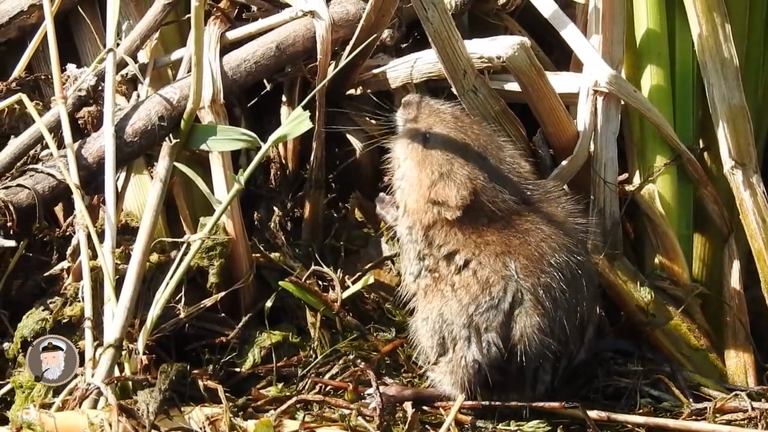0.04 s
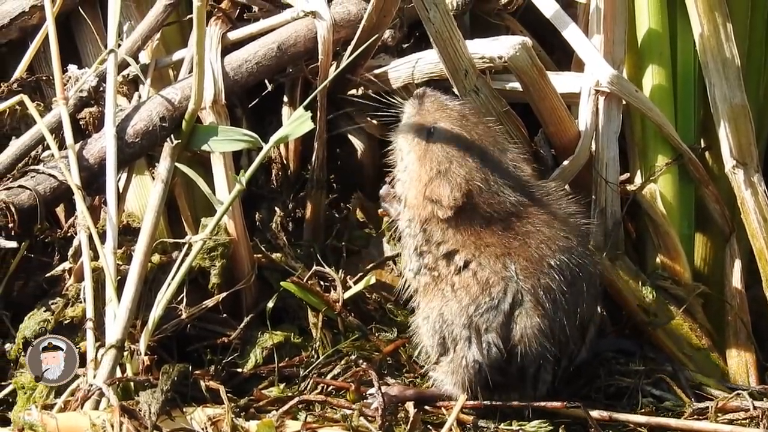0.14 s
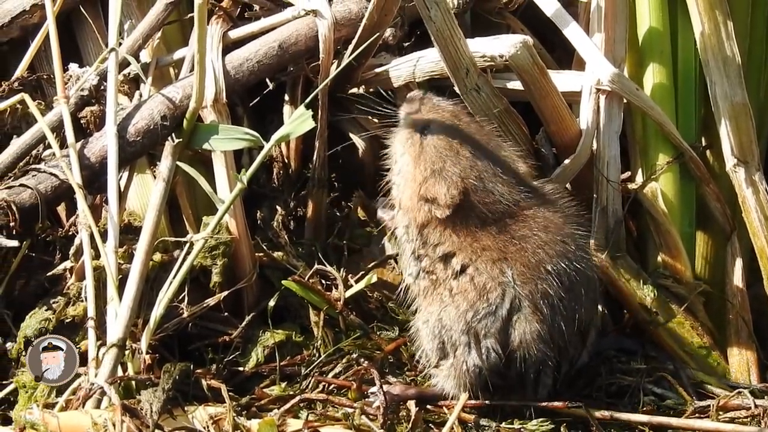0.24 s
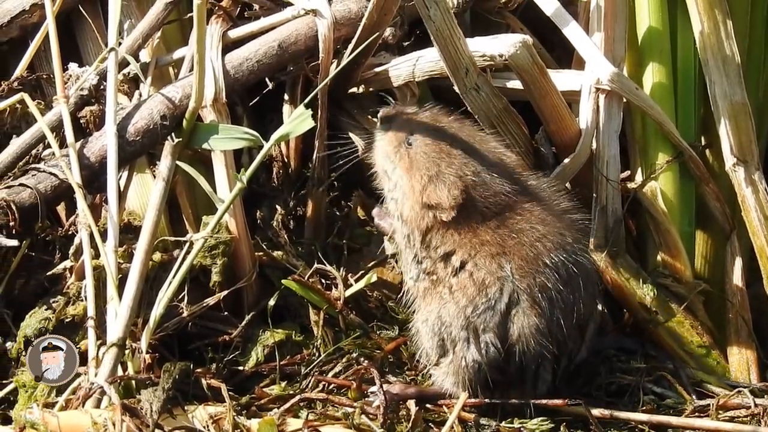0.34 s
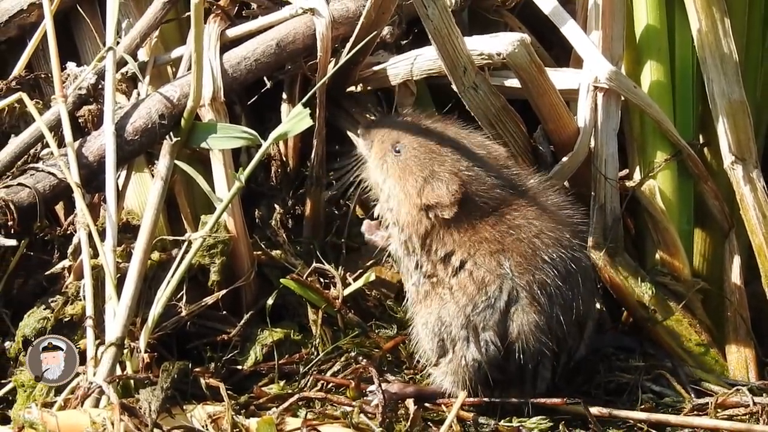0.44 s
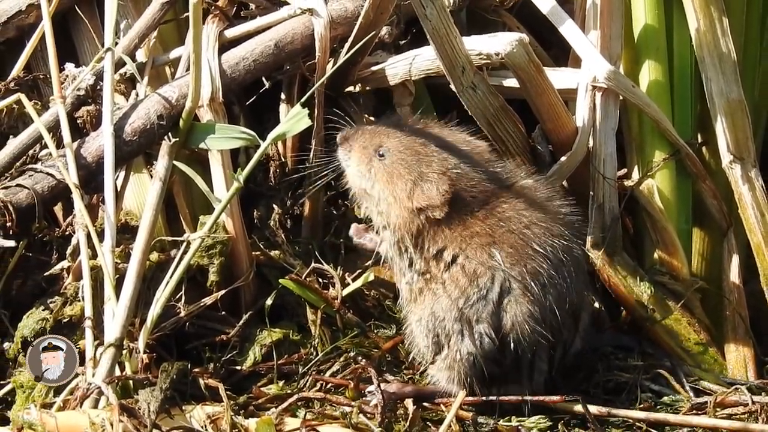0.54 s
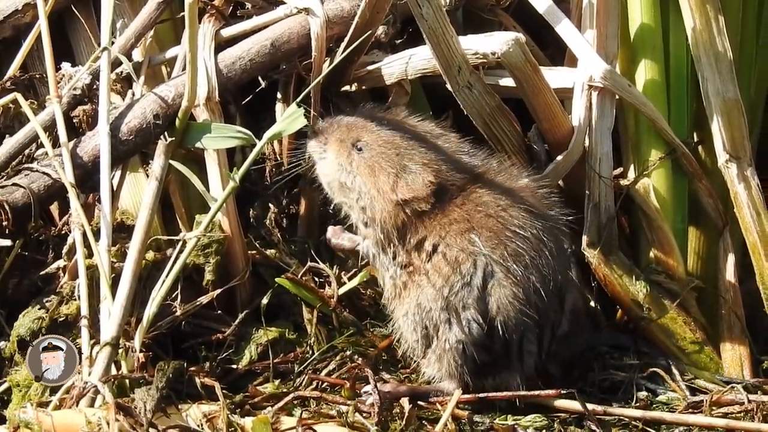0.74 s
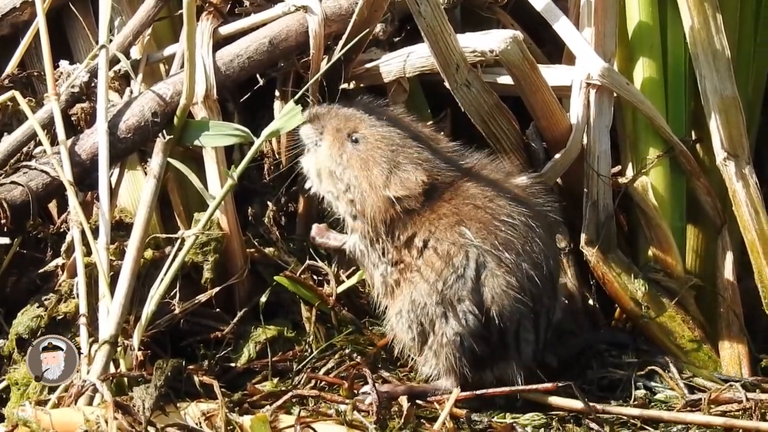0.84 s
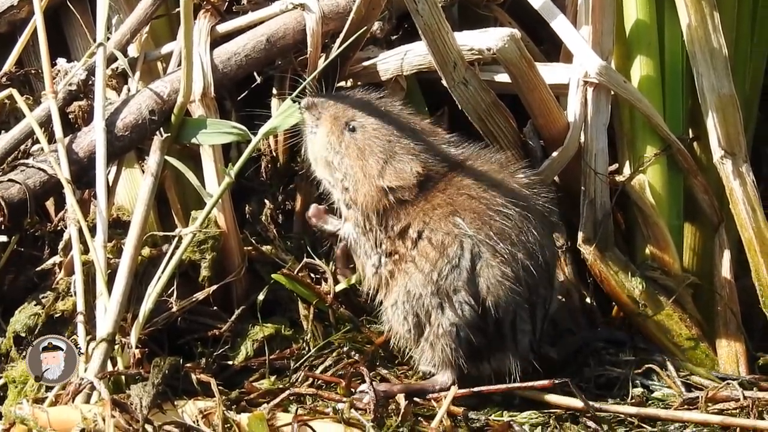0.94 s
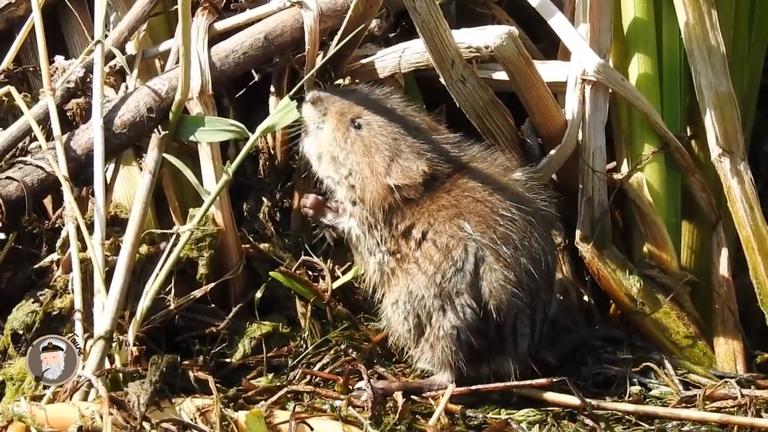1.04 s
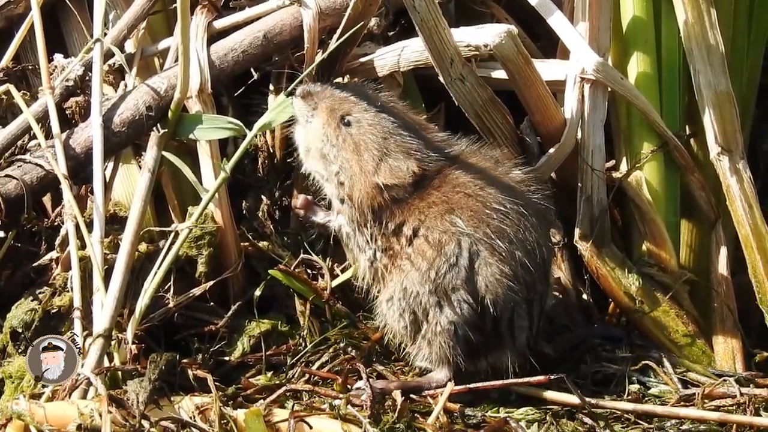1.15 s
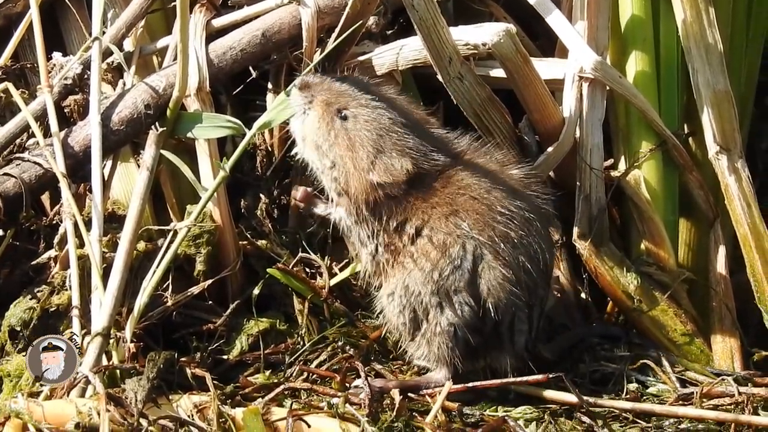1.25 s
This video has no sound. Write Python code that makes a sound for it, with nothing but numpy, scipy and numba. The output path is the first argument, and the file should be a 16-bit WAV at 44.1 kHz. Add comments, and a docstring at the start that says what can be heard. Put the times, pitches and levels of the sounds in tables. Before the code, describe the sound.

Wind blows through a reed bed, dry leaves hissing steadily. Early on, a gust rumbles and knocks on the microphone, mostly on the left, then eases as a distant bird gives two faint, raspy chirps.

```python
"""Dry reed leaves hiss and tick over the low rush of open air as wind blows through a reed bed.
Soon swirls of wind (eddies) rumble and knock on the two microphone openings, mostly the left one.
The strongest push the recorder into its limiter, which briefly turns the sound down.
Later a far bird gives two short, raspy calls."""
import sys
import numpy as np
from scipy import signal
from scipy.fft import rfft, irfft
from scipy.io import wavfile
from scipy.ndimage import uniform_filter1d
from numba import njit

SR = 44100
rng = np.random.default_rng(int(sys.argv[2]) if len(sys.argv) > 2 else 0)


def log_audio(samples):
    """Write samples as a 16-bit WAV file to the path given in sys.argv[1]."""
    # one column per channel
    frames = np.atleast_2d(samples).T
    # limit to full scale, then quantise
    limited = np.clip(frames, -1, 1)
    pcm = np.round(limited * 32767).astype(np.int16)
    wavfile.write(sys.argv[1], SR, pcm)


N = 57330  # 1.3 s


def undb(db):
    """Turn decibels into a number to multiply by."""
    return 10 ** (np.asarray(db) / 20)


def unit(x):
    """Scale a signal to an average strength (rms) of 1."""
    return x / np.sqrt(np.mean(x ** 2))


def noise(channels=2):
    """Plain white noise, different in each channel."""
    return rng.standard_normal((channels, N))


def shape(x, points):
    """Turn frequencies up or down along a curve of (f/Hz, gain/dB) points."""
    hz, db = np.array(points).T
    f = np.maximum(np.linspace(0, SR / 2, N + 1), 1)
    gain = undb(np.interp(np.log(f), np.log(hz), db))
    return irfft(rfft(x, 2 * N) * gain)[..., :N]


def colour(x, points):
    """Give a noise the tone of such a curve, at strength 1."""
    return unit(shape(x, points))


def band(x, hz, width_hz):
    """Keep the sound near one pitch, as a resonance does, at strength 1."""
    f = np.arange(N // 2 + 1) * SR / N
    return unit(irfft(rfft(x) / (1 + (2 * (f - hz) / width_hz) ** 2), N))


def smooth(x, width):
    """Round off quick changes by averaging twice over `width` samples."""
    return uniform_filter1d(uniform_filter1d(x, width), width)


def wander(rate_hz):
    """A curve that drifts between random values, rate_hz of them a second."""
    hold = int(SR / rate_hz)
    steps = np.repeat(rng.standard_normal(200), hold)[:N]
    return unit(smooth(steps, hold))


def flicker(x, depth_db, rate_hz):
    """Let each of ten octaves waver in level, partly together with the others."""
    f = np.arange(N // 2 + 1) * SR / N
    octave = np.log2(np.clip(f / 30, 1, 2 ** 9))
    spectrum, shared = rfft(x), wander(rate_hz / 2)
    out = 0
    for k in range(10):
        part = irfft(spectrum * np.maximum(1 - abs(octave - k), 0), N)
        out += part * undb(depth_db * (wander(rate_hz) + shared / 2))
    return out


def swell(t, at, length):
    """A smooth rise and fall around `at`, with half the power at the ends of its length."""
    return 2 ** (-2 * ((t - at) / length) ** 2)


# Tone of the open air: f/Hz, relative level/dB
AIR_TONE = [(25, -3), (60, 4), (120, 5.5), (200, 3), (300, -4), (420, -4.5), (560, -2), (750, -8.5),
            (1100, -9), (1700, -14.5), (3000, -15.5), (5000, -18), (8000, -28), (15000, -76)]
# How loud the air is: t/s, low part level/dB, high part level/dB
AIR_LEVELS = [(0, -44, -47.5), (.25, -47.5, -50), (.5, -44.5, -49.5), (.73, -44.5, -49), (.9, -44, -50.5),
              (1.05, -44.5, -51), (1.18, -41.5, -51), (1.3, -43, -50)]

def open_air(t, split_hz=663):
    """Distant wind rushes, nearly the same left and right; its low and high parts swell separately."""
    rush = colour(noise(channels=1) + 0.24 * noise(), AIR_TONE)
    rush = flicker(rush, depth_db=2, rate_hz=22.23)
    low = signal.sosfiltfilt(signal.butter(2, split_hz, fs=SR, output="sos"), rush)
    times, low_db, high_db = np.array(AIR_LEVELS).T
    low_gain, high_gain = undb(np.interp(t, times, low_db)), undb(np.interp(t, times, high_db))
    return unit(low) * low_gain + unit(rush - low) * high_gain


# The bird's calls: t/s, length/s, pitch/Hz, level/dB of the lower resonance
BIRD_CALLS = [(0.778, 0.019, 4550, -45.5), (1.02, 0.012, 4900, -45.5)]

def far_bird(t, echo_db=-14, echo_fade_s=0.043):
    """Short raspy chirps ring at two pitches; the reeds scatter them into a faint echo."""
    out = 0
    for at, length, hz, db in BIRD_CALLS:
        lower = band(noise(channels=1) + 0.5 * noise(), hz, width_hz=870)
        upper = undb(-1.5) * band(noise(), hz=6440, width_hz=1500)
        echo = undb(echo_db) * (t > at) * np.exp(-abs(t - at) / echo_fade_s)
        out += undb(db) * (lower + upper) * np.maximum(swell(t, at, length), echo)
    return out


# Tone of the dry leaves: f/Hz, relative level/dB
LEAF_TONE = [(500, -16.5), (1500, -13), (2600, -14), (3700, -10.5), (4600, -4), (5600, -1.5), (6600, 2),
             (7300, -3), (8300, -10.5), (10000, -18.5), (12500, -26.5), (15500, -32)]
# How loud the leaves rustle: t/s, level/dB
RUSTLE_LEVELS = [(0, -43), (.15, -45.5), (.35, -45.5), (.55, -46.5), (.68, -45), (.79, -44), (.95, -46),
                 (1.15, -45), (1.3, -48)]

def reeds(t, ticks_per_s=2300, tick_spread_db=1.5, tick_share=0.32):
    """Countless leaves rub together: far ones blur into a hiss, near ones tick."""
    ticks = (rng.random((2, N)) < ticks_per_s / SR) * rng.choice([-1, 1], (2, N))
    tick_db = tick_spread_db * np.minimum(rng.exponential(size=(2, N)), 5)
    ticks = unit(ticks * undb(tick_db))
    leaves = colour(np.sqrt(tick_share) * ticks + np.sqrt(1 - tick_share) * noise(), LEAF_TONE)
    times, db = np.array(RUSTLE_LEVELS).T
    level_db = np.interp(t, times, db) + np.array([[0.8], [-0.8]])  # a little louder on the left
    return flicker(leaves, depth_db=1.5, rate_hz=24.32) * undb(level_db)


# Tone of an eddy: multiple of its centre frequency, relative level/dB
EDDY_TONE = [(.22, -40), (.4, -13.5), (.65, -2.5), (1, 2), (1.45, -6), (2.1, -17.5), (3, -26), (5.5, -38.5),
             (13, -51.5), (44, -66)]

def eddy(hz, even_out_s=0.0097):
    """Swirling air makes the pressure rumble around one frequency, evened out to a steady strength."""
    churn = colour(noise(channels=1)[0], [(hz * ratio, db) for ratio, db in EDDY_TONE])
    return churn / np.sqrt(smooth(churn ** 2, int(even_out_s * SR)))


# Passing eddies: t/s, length/s, relative level/dB, centre f/Hz, side (0 left, 1 right)
PASSING_EDDIES = [(0.212, 0.012, -21, 86, 0), (0.245, 0.027, -8, 103.3, 0), (0.28, 0.032, -25.5, 106, 0),
                  (0.311, 0.026, -5, 77.7, 0), (0.35, .045, -15, 103, 0), (0.441, 0.023, -28.5, 103, 0),
                  (.506, 0.025, -16.5, 75, 0), (0.534, 0.081, -32.5, 108, 0), (0.598, 0.015, -23.5, 62, 0),
                  (0.641, 0.024, -35.5, 92, 0), (0.77, 0.094, -39.5, 85, 0), (1.031, .03, -35.5, 100, 0),
                  (1.124, 0.025, -29, 99, 0), (1.187, 0.013, -22.5, 117, 0), (1.256, 0.049, -29, 91, 0),
                  (0.277, .05, -28.5, 92, 1), (0.36, 0.028, -12, 116, 1), (0.58, 0.051, -31.5, 77, 1),
                  (0.777, 0.021, -25, 81.5, 1), (1.273, .04, -28, 99, 1)]
# How a microphone opening responds to wind, with the deepest bass cut: f/Hz, gain/dB
MIC_RESPONSE = [(20, -39), (32, -10.5), (46, 0.5), (70, -0.5), (185, 0.5), (255, -5), (400, -8.5),
                (2000, -12.5)]

def wind_on_microphone(t, draught_db=-54.5, eddy_trim_db=-0.5):
    """Each opening feels its own light draught, and a swell of rumble whenever an eddy passes."""
    pressure = undb(draught_db) * np.array([eddy(hz=90), eddy(hz=90)])
    for at, length, db, hz, side in PASSING_EDDIES:
        pressure[int(side)] += undb(db + eddy_trim_db) * swell(t, at, length) * eddy(hz)
    return shape(pressure, MIC_RESPONSE)


# Knocks of the gust: t/s, thud peak level/dB, crackle level/dB (6 dB above its average strength)
GUST_KNOCKS = [(0.2478, -22.5, -39), (0.2981, -13, -42), (0.3174, -21, -38)]
# Tone of a knock's crackle: f/Hz, relative level/dB
CRACKLE_TONE = [(3000, -15), (9000, 4), (12500, 2), (15500, -5)]

def gust_knocks(t, rise_s=0.00025, fall_s=0.001, crackle_s=0.0012):
    """The gust overloads the left opening: sudden drops in pressure, and with each a tiny crackle sounds high
    in the treble."""
    out = np.zeros((2, N))
    crackle = colour(noise(channels=1)[0], CRACKLE_TONE) / 2
    for at, thud_db, crackle_db in GUST_KNOCKS:
        age = np.maximum(t - at, 0)
        thud = (1 - np.exp(-(age / rise_s) ** 2)) * np.exp(-age / fall_s)
        out[0] -= undb(thud_db) * thud / thud.max()
        out[0] += undb(crackle_db) * crackle * swell(t, at, crackle_s)
    return out


def scene():
    """Add the wind on the microphone to the air, reeds and bird, in stereo."""
    t = np.arange(N) / SR
    return wind_on_microphone(t) + gust_knocks(t) + open_air(t) + reeds(t) + far_bird(t)


@njit
def follow_peaks(x, rise_s, fall_s):
    """Track a signal's peaks, going up at one speed and down at another."""
    rise, fall = 1 / (1 + rise_s * SR), 1 / (1 + fall_s * SR)
    out, level = np.empty(len(x)), 0.
    for i in range(len(x)):
        level += (x[i] - level) * (rise if x[i] > level else fall)
        out[i] = level
    return out


def record(dry, limit=0.36, top_hz=15500):
    """One limiter turns both channels down on the loudest peaks; then the highest treble is cut."""
    peak = follow_peaks(abs(dry).max(axis=0), rise_s=0.0015, fall_s=0.012)
    limited = dry * limit / np.maximum(peak, limit)
    return signal.sosfilt(signal.ellip(10, .1, 80, top_hz, fs=SR, output="sos"), limited)


dry = scene()
out = record(dry)
log_audio(out)
```